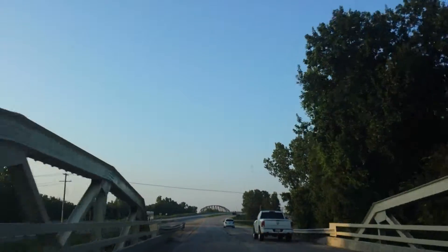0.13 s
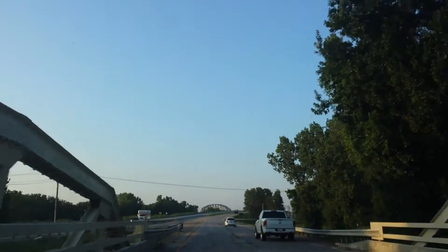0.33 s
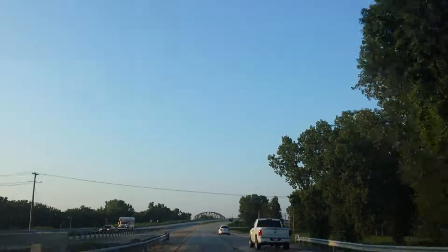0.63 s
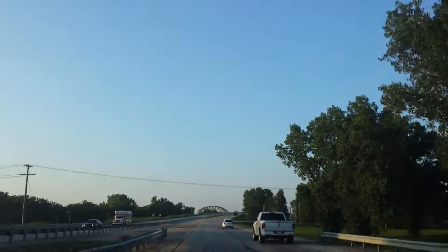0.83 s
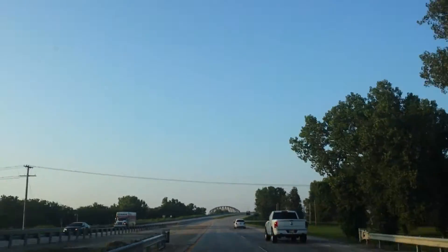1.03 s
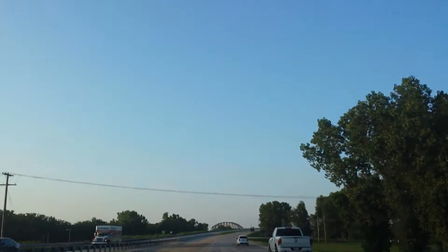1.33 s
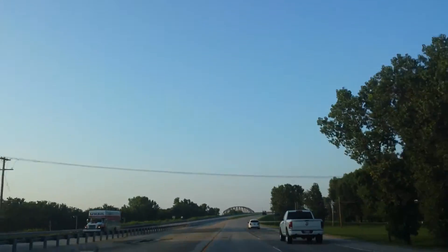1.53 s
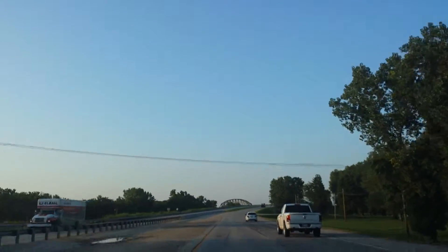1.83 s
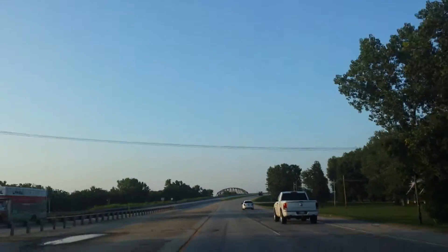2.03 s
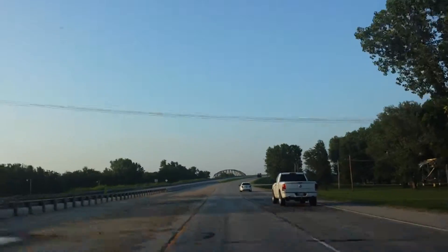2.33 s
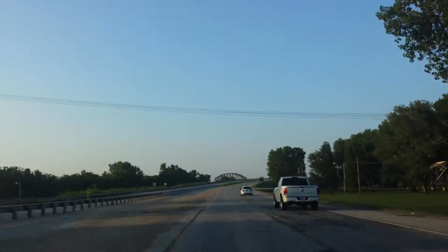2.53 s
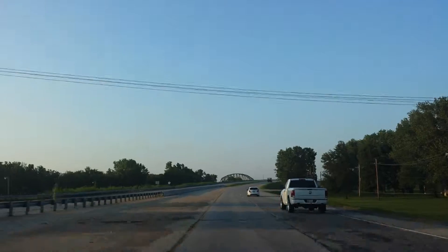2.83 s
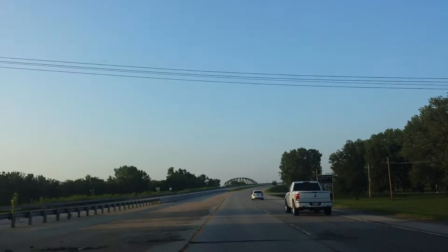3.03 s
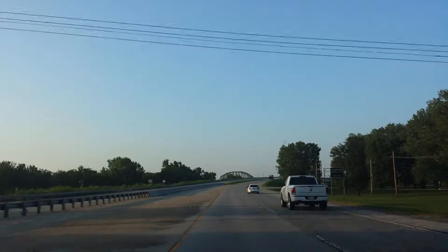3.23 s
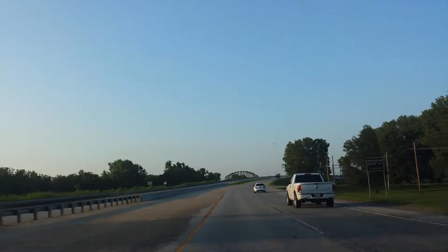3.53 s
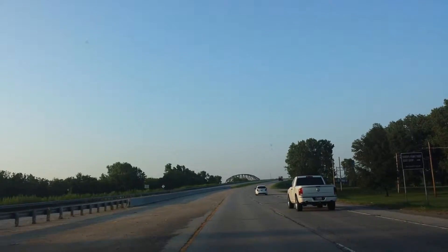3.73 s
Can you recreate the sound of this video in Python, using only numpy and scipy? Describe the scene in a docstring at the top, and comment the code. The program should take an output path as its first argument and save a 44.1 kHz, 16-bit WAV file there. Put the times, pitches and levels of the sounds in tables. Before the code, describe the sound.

A car drives steadily, heard in stereo from the front seat. Deep cabin rumble dominates, with low booms swelling around 1.2-1.8, 3 and 3.7 seconds, over muffled tyre roar and faint hiss. Seams knock about every 0.2 seconds at first, with a heavy thud at 1.07, a sharp knock at 2.05 and another thud at 3.1. A loose object slides and clicks sharply near 0.1, then chatters intermittently, sliding again around 3.35.

```python
"""Inside a car that drives off a bridge onto a highway.
From the start, filtered noise gives the cabin's rumble, the tyres' roar and sizzle, and a hiss of air.
A loose object trembles and slides from the outset: a swarm of tiny contacts excites its resonances.
Seams then strike a knock, a thud and decaying cabin modes; the object soon clicks and chatters as well.
Swells of the road drive wandering sine tones that build and die away in the cabin."""
import sys
import numpy as np
from scipy import signal
from scipy.fft import rfft, irfft
from scipy.io import wavfile
from scipy.ndimage import uniform_filter1d

SR = 44100
rng = np.random.default_rng(int(sys.argv[2]) if len(sys.argv) > 2 else 0)


def file_out(sig):
    """Save sig as 16-bit WAV at sys.argv[1]."""
    # one column per channel
    cols = np.atleast_2d(sig).T
    # limit, then scale
    lim = np.clip(cols, -1, 1)
    pcm = np.round(lim * 32767).astype(np.int16)
    wavfile.write(sys.argv[1], SR, pcm)


N = 171549
T = np.arange(N) / SR
HZ = np.fft.rfftfreq(N, 1 / SR)


def amp(db):
    """Logarithmic level: 20 dB is a factor of ten in amplitude."""
    return 10 ** (np.asarray(db) / 20)


def unit(x):
    """Normalisation: the root mean square becomes 1."""
    return x / np.sqrt(np.mean(x ** 2) + 1e-20)


def spectrum(points, column=1):
    """Logarithmic frequency scale: a table is interpolated linearly in dB along it."""
    rows = np.array(points, float)
    return np.interp(np.log(HZ + 1), np.log(rows[:, 0] + 1), rows[:, column])


def level(points):
    """Amplitude modulation: a level curve in dB becomes a gain over time."""
    return amp(np.interp(T, *np.transpose(points)))


def drift(rate_hz):
    """Low-pass noise: a Gaussian filter leaves slow random wandering, rms 1."""
    white = rfft(rng.standard_normal(N))
    return unit(irfft(white * np.exp(-(HZ / rate_hz) ** 2), N))


def burst(start, rise, hold, fade):
    """Transient envelope: straight rise, hold, then exponential decay (all in s)."""
    attack = np.clip((T - start) / rise, 0, 1)
    return attack * np.exp(-np.maximum(T - start - rise - hold, 0) / fade)


def steadied(x, window_s):
    """Automatic gain: division by the running rms evens out the chance swells of a noise."""
    power = uniform_filter1d((x ** 2).mean(0), max(int(window_s * SR), 2))
    return unit(x / np.sqrt(abs(power) + 1e-9))


ECHO_S, ECHO_DB = 0.011, -1  # decay of the reflections, and their treble level against the direct sound


def reflections():
    """Multipath interference: windows and trim give the treble a fine ripple at each microphone."""
    t = T[:2048]
    taps = rng.standard_normal((2, len(t))) * np.exp(-t / ECHO_S)
    ripple = rfft(taps / np.linalg.norm(taps, axis=1, keepdims=True), N)
    treble_share = HZ ** 2 / (HZ ** 2 + 2200 ** 2)
    return 1 + amp(ECHO_DB) * ripple * treble_share


# Stereo width of the noise field: f/Hz, level/dB of the microphones' difference relative to their sum
WIDTH = [(25, -26), (42, -20), (65, -19), (140, -21), (210, -13.5), (320, -10.5), (420, -5), (550, -5.5),
         (680, -2.5), (820, -1.5), (1100, -2), (1550, 5), (2000, -1.5), (2500, 0.5), (4000, 0.5)]
# Stereo balance of the noise field: f/Hz, left minus right level/dB
ROAD_BALANCE = [(30, -3), (90, 0), (250, 0), (380, 2), (550, 0), (790, 0.2), (1100, 3.5), (1650, 6.5),
                (2400, 3.5), (3400, -6), (5300, 6), (7500, -3.5), (9000, -9), (12000, -1)]
# Phase lead of the bass at the right microphone: f/Hz, phase/rad
LEAD = [(30, .11), (90, 0.26), (200, 0)]


def cabin_noise(colour):
    """Spatial coherence: coloured noise alike at both microphones in the bass, more diffuse above."""
    common, opposed = rfft(rng.standard_normal((2, N)))
    width = amp(spectrum(WIDTH))
    lean = amp(spectrum(ROAD_BALANCE) / 2) * np.exp(-.5j * spectrum(LEAD))
    left = (common + width * opposed) * lean
    right = (common - width * opposed) / lean
    pair = np.array([left, right]) / np.hypot(1, width)
    in_table = HZ < colour[-1][0]  # silent past the last frequency of the table
    return unit(irfft(pair * amp(spectrum(colour)) * in_table * reflections(), N))


# Course of the lowest rumble before its trim: t/s, level/dB
SUB_LEVEL = [(0, -24), (0.8, -24.5), (0.9, -19.5), (1.06, -27.5), (1.18, -18), (1.69, -25), (2.15, -29),
             (2.65, -31), (3.18, -23.5), (3.54, -29), (3.74, -18), (3.89, -29)]
# Colour of the lowest rumble: f/Hz, relative level/dB per Hz
SUB_COLOUR = [(12, -17), (23, 4), (32, -2), (43, 13), (55, -6), (70, -17), (150, -60)]


def sub_rumble():
    """Forced vibration: the road shakes the body into a deep rumble."""
    return steadied(cabin_noise(SUB_COLOUR), window_s=0.17) * level(SUB_LEVEL) * amp(-0.5)


# Course of the cabin boom before its trim: t/s, level/dB
BOOM_LEVEL = [(0, -21.5), (.2, -19), (.4, -23), (.48, -19), (.6, -20.5), (1.05, -22.5), (1.09, -16.5),
              (1.22, -14), (1.32, -19), (1.47, -17.5), (1.58, -20.5), (1.8, -14), (1.95, -17), (2.02, -22),
              (2.18, -17.5), (2.35, -21.5), (2.76, -22.5), (2.95, -16), (3.1, -16.5), (3.25, -20),
              (3.41, -24), (3.55, -21), (3.72, -17.5), (3.89, -23)]
# Colour of the cabin boom: f/Hz, relative level/dB per Hz
BOOM_COLOUR = [(35, -39), (58, -4.5), (72, -4), (82, 2.5), (92, -5), (103, -2), (113, 1.5), (126, -4.5),
               (150, -13), (300, -60)]


def cabin_boom():
    """Enclosure resonance: noise with the peaked bass spectrum of the cabin."""
    return steadied(cabin_noise(BOOM_COLOUR), window_s=0.065) * level(BOOM_LEVEL) * amp(2.73)


# Course of the upper bass before its trim: t/s, level/dB
BASS_LEVEL = [(0.0, -18), (0.36, -26), (0.46, -20), (1.04, -22.5), (1.14, -16.5), (1.52, -19),
              (1.66, -19.5), (1.88, -18.5), (2.79, -21.5), (2.81, -16.5), (3.08, -26), (3.24, -18),
              (3.28, -26.5), (3.62, -22.5), (3.69, -16.5), (3.77, -24), (3.89, -20)]
# Colour of the upper bass: f/Hz, relative level/dB per Hz
BASS_COLOUR = [(90, -23), (128, -7), (148, -1), (178, -1), (210, -4.5), (240, -9.5), (290, -20), (600, -56)]


def upper_bass():
    """Structure-borne sound: the shaken body radiates a band of bass noise above the boom."""
    return steadied(cabin_noise(BASS_COLOUR), window_s=0.13) * level(BASS_LEVEL) * amp(0.5)


# Course of the cabin drone before its trim: t/s, level/dB
DRONE_LEVEL = [(0, -28), (1.03, -30.5), (1.13, -22.5), (1.2, -28.5), (1.65, -28.5), (1.95, -25), (3.2, -29),
               (3.5, -26), (3.89, -31)]
# Colour of the cabin drone: f/Hz, relative level/dB per Hz
DRONE_COLOUR = [(120, -41), (220, -9), (270, 1), (340, -7.5), (380, -5.5), (435, -3.5), (500, -15.5),
                (800, -25), (2000, -80)]


def drone():
    """Structure-borne sound: the shaken body also radiates a low-mid band of noise."""
    return steadied(cabin_noise(DRONE_COLOUR), window_s=0.198) * level(DRONE_LEVEL) * amp(-0.3)


# Road surface, as the course of the tyre roar before its trim: t/s, level/dB
SURFACE = [(0, -36), (.3, -35), (1.0, -36.5), (1.5, -37.5), (1.85, -35.5), (2.0, -33.5), (2.2, -35),
           (2.4, -32), (2.5, -33), (2.58, -34), (2.77, -32.5), (3.03, -36), (3.25, -34.5), (3.43, -35),
           (3.58, -33), (3.76, -38), (3.83, -32.5), (3.89, -35)]
# Colour of the tyre roar: f/Hz, relative level/dB per Hz
ROAR_COLOUR = [(200, -11), (450, -0.5), (570, -4), (695, 3.5), (780, 0.5), (870, 1.4), (1020, -3),
               (1150, -5), (1450, -9), (2000, -21), (3000, -37), (16000, -75)]


def tyre_roar(flutter_db=1.5, flutter_hz=35):
    """Tread excitation: broadband roar follows the road surface, with a random flutter in level."""
    fluttering = cabin_noise(ROAR_COLOUR) * amp(flutter_db * drift(flutter_hz))
    return steadied(fluttering, window_s=0.15) * level(SURFACE) * amp(3.0)


# Course of the tread sizzle before its trim, brighter on the bridge deck: t/s, level/dB
SIZZLE_LEVEL = [(0, -41), (1.15, -42.5), (1.38, -45), (2.3, -44.5), (3.03, -46.5), (3.4, -44), (3.89, -46)]
# Colour of the tread sizzle: f/Hz, relative level/dB per Hz
SIZZLE_COLOUR = [(600, -46), (1200, 4), (1600, 4.5), (2050, 1), (2600, -4), (3400, -10), (6000, -21),
                 (16000, -55)]


def tread_sizzle():
    """Tread excitation: a higher band of noise follows its own level with a slight flutter."""
    return cabin_noise(SIZZLE_COLOUR) * level(SIZZLE_LEVEL) * amp(2.5 + .5 * drift(25))


# Colour of the hiss of air: f/Hz, relative level/dB per Hz
AIR_COLOUR = [(1500, -21), (3400, -7.5), (4400, -1.5), (5700, .5), (7300, -2.5), (9000, -11.5),
              (11000, -14.5), (12200, -18.5), (15700, -19)]
AIR_DB = -46.5  # mean level


def air_hiss():
    """Flow noise: a steady treble hiss of air, wavering by half a decibel rms."""
    return cabin_noise(AIR_COLOUR) * amp(AIR_DB + .5 * drift(60))


GRAINS_PER_S, GRAIN_SPREAD_DB = 6000, 1.8


def contacts():
    """Poisson impacts: a dense random swarm of tiny contacts, some stronger than others."""
    occurs = rng.random(N) < GRAINS_PER_S / SR
    size = occurs * amp(GRAIN_SPREAD_DB * np.minimum(rng.exponential(1, N), 4))
    return unit(size * rng.standard_normal((2, N)))


def causal(db):
    """Minimum phase: the folded cepstrum gives a response with no sound before the hit."""
    log_gain = irfft(np.log(amp(db)), N)
    fold = np.where(np.arange(N) < N // 2, 2, 0)
    fold[0] = 1
    response = irfft(np.exp(rfft(log_gain * fold)), N)[:2048]
    return response / np.linalg.norm(response)


# Ringing modes of the loose object: f/Hz, relative level/dB
RING = [(4650, -8), (4990, 4), (6950, -4), (7390, 0), (7960, -4), (9820, -9), (10740, -6)]
RING_FADE_S = .013


def sounding(drive, colour, ring_db):
    """Convolution: contacts excite the object's broad colour and its faint decaying modes."""
    t = T[:2048]
    out = []
    for channel in range(2):
        modes = sum(amp(db) * np.sin(2 * np.pi * (hz * t + rng.random())) for hz, db in RING)
        ring = modes * np.exp(-t / RING_FADE_S)
        broad = causal(spectrum(colour, column=channel + 1))
        response = broad + amp(ring_db) * ring / np.linalg.norm(ring)
        out.append(signal.oaconvolve(drive[channel], response)[:N])
    return np.array(out) * amp([[-2], [-1]])  # left, right


PATCHY_DB = 2.5  # rms unevenness


def patchy(x, size=(1, 7, 9)):
    """Time-varying filtering: no two touches land alike, as smoothed random gains vary the colour."""
    z = signal.stft(x, nperseg=256)[2]
    patches = rng.standard_normal(z.shape[1:])
    patches = uniform_filter1d(patches, size[1], axis=0)  # over frequency
    patches = uniform_filter1d(patches, size[2], axis=1)  # over time
    gain = unit(amp(PATCHY_DB * unit(patches)))
    return signal.istft(z * gain, nperseg=256)[1][:, :N]


# Bursts of chatter, from their onset: t/s, relative level/dB
CHATTER = [(.066, -43), (.548, -40.5), (.752, -45), (1.005, -45), (1.105, -39.5), (1.197, -42),
           (1.235, -39), (1.28, -42), (1.335, -38), (1.417, -41.5), (1.541, -43), (1.603, -38),
           (1.671, -37), (1.724, -40.5), (1.862, -47), (1.908, -37.5), (1.945, -39.5), (1.99, -42),
           (2.10, -39.5), (2.116, -39), (2.15, -43), (2.19, -42.5), (2.591, -39.5), (2.8, -42.5),
           (2.848, -43), (2.889, -43), (2.928, -38.5), (2.969, -41.5), (3.017, -44.5), (3.067, -38),
           (3.099, -37), (3.15, -37.5), (3.238, -40), (3.636, -42), (3.725, -41), (3.763, -37),
           (3.87, -42.5)]
CHATTER_RISE_S, CHATTER_HOLD_S, CHATTER_FADE_S = .0025, .011, .011
# Slides of the object, at their peak: t/s, relative level/dB, rise/s, fade/s
SLIDES = [(.10, -31.5, 0.17, 0.087), (.275, -42.5, 0.055, 0.037), (1.26, -40.5, 0.11, 0.17),
          (3.335, -34, 0.06, 0.053), (3.38, -41, 0.029, 0.064)]
# Colour when struck and when sliding: f/Hz, left relative level/dB per Hz, right relative level/dB per Hz
STRUCK = [(800, -45, -51), (2500, -11, -8), (3800, -5, -10), (4300, 6, -9.5), (4640, 2.5, -5.5),
          (5400, -7.5, -2), (6200, 0.5, -8), (7300, -1, -0.5), (8270, -3, -2.5), (9100, -10, -8),
          (10940, -10, -9.5), (12200, -13, -12), (14000, -14, -17), (15500, -21, -18)]
SLIDING = [(800, -25, -75), (3500, -4, -22), (4640, -4, -3), (5670, 4, -9), (7100, -1, 4.5),
           (8600, -7, -2.5), (9400, -17, -8), (9900, -4, -9), (11900, -20, -10.5), (14100, -9, -13),
           (15500, -38, -18)]
RING_STRUCK_DB, RING_SLIDING_DB = -8, -17  # ring against the broad colour
# tremble: level against the boom's curve, unevenness, and how fast it varies
TREMBLE_DB, TREMBLE_SPREAD_DB, TREMBLE_HZ = -38.5, 7.5, 25


def loose_object():
    """Contact excitation: the small object trembles, chatters and slides as the car shakes it."""
    chatter = sum(amp(db) * burst(s, CHATTER_RISE_S, CHATTER_HOLD_S, CHATTER_FADE_S) for s, db in CHATTER)
    tremble = level(BOOM_LEVEL) * amp(TREMBLE_DB + TREMBLE_SPREAD_DB * drift(TREMBLE_HZ))
    slides = 0
    for s, db, rise, fade in SLIDES:
        slides = slides + amp(db) * np.exp(-np.maximum((s - T) / rise, (T - s) / fade))
    struck = np.hypot(chatter, tremble) * contacts()
    struck_sound = sounding(struck, STRUCK, RING_STRUCK_DB)
    sliding_sound = sounding(slides * contacts(), SLIDING, RING_SLIDING_DB)
    return patchy(struck_sound + sliding_sound)


# Seams in the road: t/s, knock level/dB, low thud level/dB before its trim
SEAMS = [(.005, -30, -28), (.225, -30.5, -29), (0.43, -31, -27), (0.621, -30, -43), (0.838, -30.5, -33),
         (1.066, -27.5, -14.5), (2.045, -23.5, -32), (2.249, -37, -40), (2.349, -30, -33),
         (2.616, -29, -36), (2.791, -32, -24), (3.11, -33, -18.5), (3.535, -32, -29)]
SEAM_RISE_S, KNOCK_FADE_S, THUD_FADE_S = 0.0067, 0.03, 0.094
# Colour of the knock and of the thud: f/Hz, relative level/dB per Hz
KNOCK_COLOUR = [(150, -49), (400, 8.5), (850, 14.5), (1200, -1), (2000, -14), (4000, -88), (16000, -80)]
THUD_COLOUR = [(20, -18), (70, 6.5), (150, -18), (280, -14), (500, -19), (1500, -72)]
# Cabin modes that a seam sets ringing: f/Hz, relative level/dB, fade/s
JOLT_MODES = [(92, 0, .032), (215, -11, 0.02), (290, -14, 0.02)]
JOLT_DB = 7  # gain of the modes over the thud levels in the table


def seams():
    """Impulse response: each seam gives a tyre knock, a body thud and a jolt that rings cabin modes."""
    knock = sum(amp(db) * burst(s, SEAM_RISE_S, 0.0076, KNOCK_FADE_S) for s, db, _ in SEAMS)
    thud = sum(amp(db) * burst(s, SEAM_RISE_S, 0, THUD_FADE_S) for s, _, db in SEAMS)
    jolt = 0
    for s, _, db in SEAMS:
        t = np.maximum(T - s - SEAM_RISE_S, 0)
        for hz, mode_db, fade in JOLT_MODES:
            jolt = jolt + amp(db + mode_db) * np.sin(2 * np.pi * hz * t) * np.exp(-t / fade)
    knocks = knock * steadied(cabin_noise(KNOCK_COLOUR), window_s=.03)
    thuds = amp(1.0) * thud * steadied(cabin_noise(THUD_COLOUR), window_s=0.032)
    return knocks + thuds + amp(JOLT_DB) * jolt


# Sharp clicks of the loose object: t/s, relative level/dB, rise/s, fade/s, lowest f/Hz, highest f/Hz
CLICKS = [(.047, -27.5, .0055, .002, 5400, 10500), (.078, -14.5, .0006, .0011, 5400, 8800),
          (.1285, -23.5, .0014, .0045, 4300, 7700), (1.909, -36, .002, .009, 4300, 8300),
          (1.918, -30.5, .005, .014, 750, 1550)]
# Gain of the clicks at each microphone: one row each for left and right, level/dB
CLICK_SIDES_DB = [
    [-3],
    [1.5],
]
CLICK_TAIL_S, CLICK_TAIL_DB, CRACK_DB = .008, -17, -6  # tail and crack relative to the snap


def band_noise(white, order, low_hz, high_hz):
    """Band-pass filtering: white noise keeps one band, at rms 1."""
    sos = signal.butter(order, [low_hz, high_hz], "band", fs=SR, output="sos")
    return unit(signal.sosfilt(sos, white))


def clicks():
    """Transient impact: a snap in its own band over a fainter wide crack, with a brief cabin tail."""
    out = 0
    for s, db, rise, fade, low_hz, high_hz in CLICKS:
        snap, crack = rng.standard_normal((2, 2, N))
        snap = band_noise(snap, 4, low_hz, high_hz)
        crack = band_noise(crack, 2, low_hz / 3, high_hz * 1.1)
        tail = amp(CLICK_TAIL_DB) * burst(s, rise, 0, CLICK_TAIL_S)
        envelope = burst(s, rise, 0, fade) + tail
        out = out + amp(db) * envelope * (snap + amp(CRACK_DB) * crack)
    return out * amp(CLICK_SIDES_DB)


# Swells of the road, at their peak: t/s, mean f/Hz, peak level/dB, half length/s (to 1/e)
SWELLS = [(.145, 131.3, -10.5, 0.055), (1.182, 142, -9.5, 0.033), (1.31, 85.4, -11, 0.06),
          (1.397, 103.9, -13, .05), (1.662, 142.2, -10, 0.052), (1.716, 79.6, -8.5, 0.046),
          (1.848, 111, -14, 0.054), (2.89, 76.6, -14.5, 0.026), (2.982, 110, -10, 0.055),
          (3.268, 115.2, -16, 0.079), (3.27, 116.3, -17, 0.093), (3.687, 71.6, -12.5, 0.069),
          (3.752, 107.6, -9, 0.048)]
WANDER, WANDER_HZ = 0.0398, 11.8  # rms share of the pitch, and how fast it wanders


def booms():
    """Modal excitation: each swell drives the cabin at one wandering pitch, which builds and dies away."""
    out = 0
    for s, hz, db, half_s in SWELLS:
        pitch = hz * (1 + WANDER * drift(WANDER_HZ))
        turns = np.cumsum(pitch) / SR + rng.random()
        swell = amp(db) * np.exp(-((T - s) / half_s) ** 2)
        out = out + swell * np.sin(2 * np.pi * turns)
    return out


def scene():
    """Superposition: everything heard from the front seat adds linearly."""
    body = sub_rumble() + cabin_boom() + upper_bass() + drone()
    tyres = tyre_roar() + tread_sizzle()
    return body + tyres + air_hiss() + loose_object() + seams() + clicks() + booms()


CEILING, KNEE = .95, .7  # amplitudes, full scale = 1
EDGE_HZ = 15600


def record(dry):
    """Soft saturation and band limiting: the recorder rounds off the highest peaks and cuts the top."""
    over = np.maximum(abs(dry) - KNEE, 0)
    room = CEILING - KNEE
    held = dry - np.sign(dry) * (over - room * np.tanh(over / room))
    lowpass = signal.firwin(511, EDGE_HZ, window=("kaiser", 9), fs=SR)
    return signal.oaconvolve(held, lowpass[None], "same")


dry = scene()
out = record(dry)
file_out(out)
```